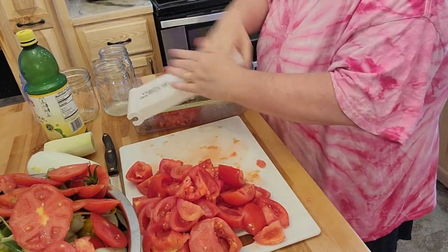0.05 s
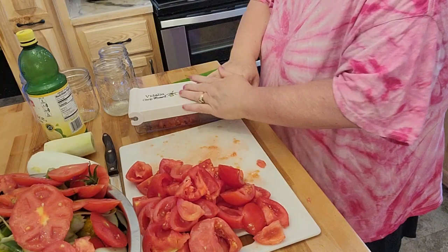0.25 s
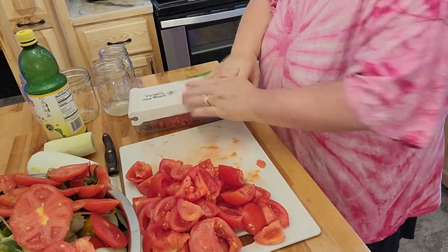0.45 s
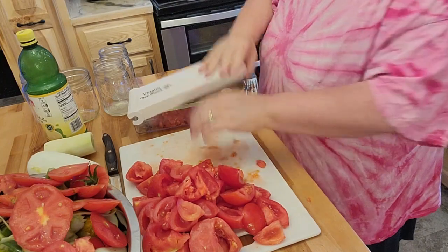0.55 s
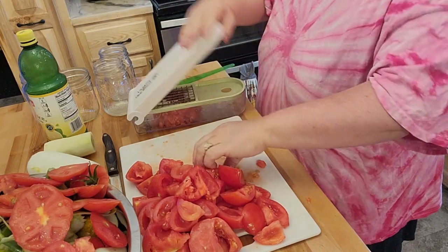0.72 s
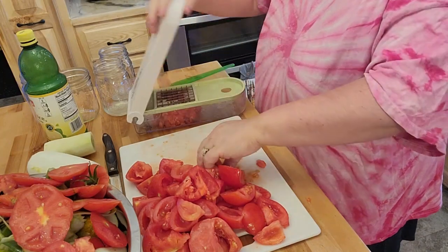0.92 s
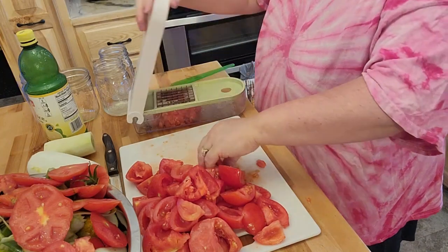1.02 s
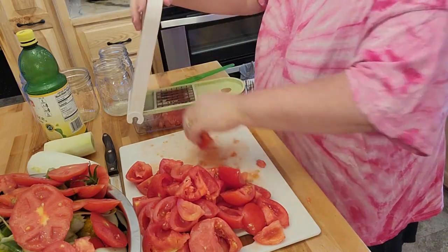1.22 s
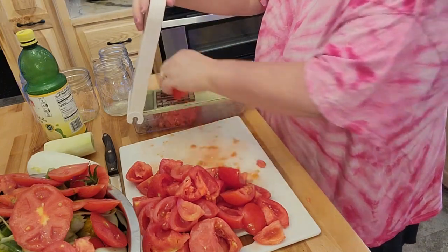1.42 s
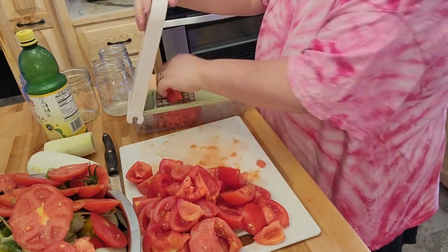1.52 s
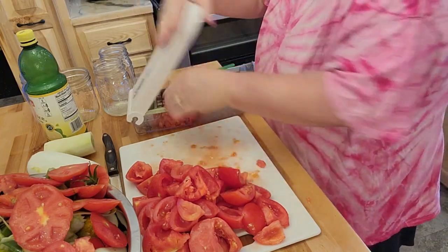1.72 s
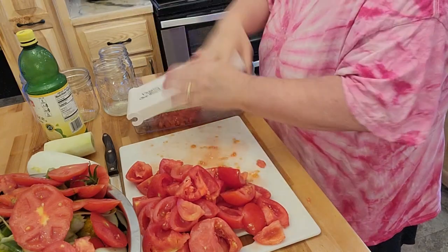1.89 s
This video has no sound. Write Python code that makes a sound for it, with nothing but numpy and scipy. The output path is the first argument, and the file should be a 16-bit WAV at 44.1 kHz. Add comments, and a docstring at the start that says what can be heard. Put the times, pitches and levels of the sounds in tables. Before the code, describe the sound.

A plastic press-down chopper shuts on tomato: a soft knock at 0.14 seconds, a brief wet squash and rising crackle, then a loud, sharp clack at about 0.24 with a low counter boom and short kitchen ring. Faint bumps and rubs follow around 0.4-0.7, then near quiet over low hum, tiny wet ticks near 1.55, a faint tap at 1.7 and a soft lid knock at 1.94.

```python
"""A plastic press-down dicer is pushed shut on tomato pieces on a kitchen counter: damped modes knock as the
lid meets the fruit, a sinking rough sine and coloured noise squash it, grainy noise crackles through the
blade grid, and a cluster of cracks slams lid on box. The counter booms and the kitchen rings briefly as
decaying noise. Soft knocks, rubs, bumps and wet ticks of handling follow over a low hum of noise, then the
lid lands on the next piece."""
import sys
import numpy as np
from scipy import signal
from scipy.fft import rfft, irfft
from scipy.io import wavfile

SR = 44100
rng = np.random.default_rng(int(sys.argv[2]) if len(sys.argv) > 2 else 0)


def unload_audio(sound):
    """Save the sound as a 16-bit wav file, at the path given as the first command line argument."""
    columns = np.transpose(np.atleast_2d(sound))
    # keep every value between -1 and 1, then stretch to whole-number steps
    steps = np.round(np.clip(columns, -1, 1) * 32767)
    wavfile.write(sys.argv[1], SR, steps.astype(np.int16))


N = 85995

# modes of the closed box: (frequency [Hz], relative level [dB], t60 [s])
BOX_MODES = [(195, -17, .12), (252, -16, 0.21), (324.5, -11, .1), (442.1, -2, 0.02), (540.4, -6.5, 0.062),
             (680, -12, .04), (784, -10, 0.021), (988, -16, 0.028), (1274, -16.5, .035), (1619, -22.5, .03),
             (1940, -18, 0.02), (3493, -21.5, .02)]
BOX_LOW_HZ = 170


def undb(db):
    """Decibels to gain."""
    return 10 ** (np.asarray(db) / 20)


def clock():
    """Time of each sample [s]."""
    return np.arange(N) / SR


def freqs():
    """Frequency of each spectral bin [Hz]."""
    return np.arange(N // 2 + 1) * SR / N


def on_log_axis(hz, table, column=1):
    """Interpolate a table column over log frequency."""
    table = np.array(table)
    return np.interp(np.log(hz + 1e-9), np.log(table[:, 0]), table[:, column])


def colour(x, table):
    """Shape a spectrum by (frequency [Hz], relative level [dB]) points, to unit RMS."""
    gain = undb(on_log_axis(freqs(), table))
    shaped = irfft(rfft(x) * gain, N)
    return shaped / shaped.std()


def pair_noise(wide_hz):
    """Noise at two microphones: alike in the bass, unrelated above wide_hz."""
    mid, side = rfft(rng.standard_normal((2, N)))
    apart = np.clip(freqs() / wide_hz, .15, 1)
    sign = np.array([[1], [-1]])
    return irfft((mid + sign * apart * side) / np.hypot(1, apart), N)


def grains(wide_hz):
    """Dense tiny clicks: noise with an exponentially spread level at each sample."""
    spread_db, max_db = 3, 12
    noise = pair_noise(wide_hz)
    boost_db = np.minimum(spread_db * rng.exponential(size=N), max_db)
    return noise * undb(boost_db)


def later(x, s):
    """Start a sound at time s."""
    k = int(np.clip(s * SR, 0, N - 1))
    silence = np.zeros(x.shape[:-1] + (k,))
    return np.concatenate([silence, x[..., :N - k]], axis=-1)


def ring(modes):
    """Damped modes after one blow."""
    out = np.zeros(N)
    for hz, db, t60_s in modes:
        t = np.arange(min(int(2 * t60_s * SR) + 2, N)) / SR
        decay = np.exp(-np.log(1000) * t / t60_s)
        out[:len(t)] += undb(db) * decay * np.sin(2 * np.pi * hz * t)
    return out


def soften(x, hz):
    """A soft contact takes away the treble."""
    sos = signal.butter(2, min(hz, SR / 3), fs=SR, output="sos")
    return signal.sosfilt(sos, x + 1e-18)


def thin(x, hz, order=2):
    """A small part radiates little below its lower edge."""
    sos = signal.butter(order, hz, "highpass", fs=SR, output="sos")
    return signal.sosfilt(sos, x + 1e-18)


def ports(x):
    """A sound reaches the left microphone slightly later."""
    lag_s = .00006  # rounds down to 2 samples
    return np.array([later(x, lag_s), x])


def slam():
    """The lid hits the box in a quick cluster of cracks that ring the plastic."""
    # blows of the lid as it shuts: (time [s], body gain [dB], crack gain [dB])
    blows = [(0.2085, -32.5, -33), (0.2327, -26, -19), (0.2398, -21, -17.5), (0.2428, -4.5, -9),
             (0.2447, -10.5, -11.5), (0.2473, -15.5, -21), (0.251, -15.5, -20), (0.2643, -24.5, -24)]
    # colour of a plastic crack: (frequency [Hz], relative level [dB])
    crack_colour = [(200, -11), (900, 0), (2100, 6), (2900, -1), (3600, 1.5), (4400, -4.5), (5500, 3),
                    (6600, -3.5), (7500, -2), (9500, -11.5), (15500, -17.5)]
    crack_decay_s, rattle_db, rattle_decay_s = 0.0015, -23.5, .012
    t, box = clock(), ring(BOX_MODES)
    fade = np.exp(-t / crack_decay_s) + undb(rattle_db) * np.exp(-t / rattle_decay_s)
    body = sum(undb(body_db) * later(box, s) for s, body_db, _ in blows)
    power = sum((undb(crack_db) * later(fade, s)) ** 2 for s, _, crack_db in blows)
    cracks = np.sqrt(power) * colour(grains(2500), crack_colour)
    return thin(ports(body) + cracks, BOX_LOW_HZ)


def squash():
    """Fruit gives way: an uneven hollow note sinks as the gap closes, with a juicy rustle."""
    # squashed fruit: (time [s], hollow resonance [Hz], level [dB])
    squash_path = [(0.141, 460, -41.5), (0.159, 393.6, -35), (0.179, 350, -34.5), (0.205, 320, -39.5),
                   (0.228, 310, -40), (0.236, 300, -16), (0.244, 290, -22), (0.256, 280, -41)]
    wobble_depth, rough_depth = .16, 0.65  # RMS, as fractions of pitch and amplitude
    juice_db, juice_hz, low_hz = -14.5, 1300, 235
    t = clock()
    s, hz, db = np.array(squash_path).T
    slow_colour = [(60, 7), (200, -6.5), (700, -42.5)]
    flutter, wobble = (colour(noise, slow_colour) for noise in rng.standard_normal((2, N)))
    juice_colour = [(250, -15), (600, 2), (900, -8), (juice_hz, 0), (2500, -14), (9000, -30)]
    juice = colour(rng.standard_normal(N), juice_colour)
    pitch_hz = np.interp(t, s, hz) * (1 + wobble_depth * wobble)
    note = np.sin(2 * np.pi * np.cumsum(pitch_hz) / SR) * (1 + rough_depth * flutter)
    pressure = undb(np.interp(t, s, db)) * (t > s[0]) * (t < s[-1])
    return ports(thin((note + undb(juice_db) * juice) * pressure, low_hz, order=4))


def cutting():
    """Skin tears on the blade grid: a faint steady crackle plus one that swells until the lid lands."""
    start_s, end_s, release_s = .16, .233, 0.0031
    steady_db, swell_db, rise_db_per_s = -57, -28, 1048
    skin_colour = [(100, -23), (400, -7.5), (1400, 8), (3000, -4), (6500, -7.5), (10000, -21), (15500, -27.5)]
    t = clock()
    swell = undb(swell_db + rise_db_per_s * np.minimum(t - end_s, 0))
    gate = (t > start_s) * np.exp(-np.maximum(t - end_s, 0) / release_s)
    return colour(grains(2500), skin_colour) * (swell + undb(steady_db)) * gate


def knocks():
    """The open lid meets fruit and fingers: its modes ring, band-limited for each contact."""
    # soft knocks of lid and hands: (time [s], gain [dB], lower edge [Hz], upper edge [Hz])
    knock_table = [(0.012, -46, 440, 685), (0.129, -33, 410, 696), (0.1398, -18.5, 376, 1484),
                   (0.148, -32.5, 378, 895.3), (0.425, -33.5, 454, 920), (0.680, -46.5, 430.8, 890),
                   (1.586, -45, 334.3, 605), (1.710, -39, 1020, 1430), (1.898, -34, 676, 1336),
                   (1.935, -35.5, 560, 1310), (1.9445, -19.5, 416, 1060)]
    # modes of the open lid: (frequency [Hz], relative level [dB], t60 [s])
    lid_modes = [(473, -5, 0.015), (566, -3.5, 0.034), (685, -6, 0.034), (1237.5, -11, .04),
                 (1430, -15, .025), (1720, -16, 0.0099), (2332, -18.5, 0.023), (3800, -10, .01)]
    lid, out = ring(lid_modes), 0
    for s, db, low_hz, high_hz in knock_table:
        knock = thin(soften(lid, high_hz), low_hz, order=4)
        out = out + undb(db) * later(knock, s)
    return ports(out)


def rubs():
    """Hands slide on the plastic in short grainy swells."""
    # rubs on the lid: (centre time [s], width between 1/e points [s], level [dB])
    rub_table = [(0.081, 0.069, -54.5), (0.568, 0.047, -57), (1.902, 0.12, -61.5)]
    # colour of a rub: (frequency [Hz], relative level [dB])
    rub_colour = [(250, -20), (470, 2), (680, 0), (900, -13), (1280, -5), (1600, -14), (4000, -25.5),
                  (8000, -35), (15000, -45)]
    t = clock()
    swells = sum(undb(db) * np.exp(-(2 * (t - s) / width_s) ** 2) for s, width_s, db in rub_table)
    return colour(grains(1300), rub_colour) * swells


def bumps():
    """Soft pressure stirs mainly the lowest modes of the box."""
    # dull bumps as the hand lifts and the fruit settles: (time [s], peak level [dB])
    bump_table = [(0.463, -44.5), (0.511, -49.5)]
    contact_hz = 380
    dull = soften(soften(ring(BOX_MODES), contact_hz), contact_hz)
    box = thin(dull, BOX_LOW_HZ, order=4)
    box = box / np.abs(box).max()
    return ports(sum(undb(db) * later(box, s) for s, db in bump_table))


def ticks():
    """Wet fingers and fruit unstick: short decaying noise."""
    # small wet ticks: (time [s], level [dB])
    tick_table = [(0.576, -64.5), (1.544, -54), (1.563, -63)]
    # colour of a tick: (frequency [Hz], relative level [dB])
    tick_colour = [(500, -19), (2600, -3), (3500, 7), (4500, -2), (5500, 9.5), (6500, -1), (7600, 0.5),
                   (9300, -2), (10500, -21), (15500, -21)]
    decay_s = 0.0035
    fade = np.exp(-clock() / decay_s)
    return sum(later(undb(db) * fade * colour(pair_noise(3000), tick_colour), s) for s, db in tick_table)


def counter():
    """The weight of the push sets the counter top booming: one damped mode that swells in."""
    start_s, rise_s = .241, .022
    mode = (75.5, -14.5, .2)  # (frequency [Hz], level before the swell [dB], t60 [s])
    swell = 1 - np.exp(-clock() / rise_s)
    return ports(later(swell * ring([mode]), start_s))


def convolve(x, response):
    """Pass a sound through a response."""
    return signal.fftconvolve(np.atleast_2d(x), np.atleast_2d(response), axes=-1)[:, :N]


def kitchen(x):
    """Early reflections from counter and cupboards, then a noise tail with its own decay in each band."""
    # reverberation: (frequency [Hz], band level [dB], t60 [s])
    room_bands = [(60, -15, 0.1), (149.85, -12, .3), (300, -12, .42), (601.7, -7, 0.38), (1190, -4, 0.47),
                  (2500, -4.5, .42), (4900, -6.5, 0.49), (9000, -11.5, .34), (15020, -5.5, .3)]
    build_s, early_db, early_decay_s, wide_hz = .008, -3, .012, 1200
    t, noise, tail = clock(), rfft(pair_noise(wide_hz)), 0
    centres = np.geomspace(60, 15000, 9)
    for hz, pick in zip(centres, np.eye(len(centres))):
        weight = np.interp(np.log(freqs() + 1), np.log(centres), pick)
        band = irfft(noise * weight, N)
        t60_s = on_log_axis(hz, room_bands, column=2)
        fade = np.exp(-np.log(1000) * t / t60_s) * (1 - np.exp(-t / build_s))
        tail = tail + band * fade / np.linalg.norm(fade) * undb(on_log_axis(hz, room_bands))
    near = np.exp(-t / early_decay_s) * (t > .002)
    early = undb(early_db) * pair_noise(wide_hz) * near / np.linalg.norm(near)
    return convolve(x, tail + early)


def room_hum():
    """A steady low hum: noise weighted to the bass."""
    # colour of the hum: (frequency [Hz], relative spectral density [dB])
    hum_colour = [(25, -16.5), (45, -6.5), (72, 6.5), (95, -4), (120, -0.5), (170, -7.5), (400, -10),
                  (1000, -16.5), (3300, -20.5), (6000, -30.5), (8400, -31.5), (9200, -41), (15500, -40.5)]
    level_db = -62.5
    return undb(level_db) * colour(pair_noise(700), hum_colour)


def scene():
    """The dicer in the kitchen, a little to the right, over the boom of the counter and the hum."""
    right_db = 0.25  # right over left
    dicer = knocks() + rubs() + squash() + cutting() + slam() + bumps() + ticks()
    hum = room_hum()
    balance = undb(np.array([[-right_db], [right_db]]) / 2)
    return (dicer + kitchen(dicer) + counter()) * balance + hum


def record(dry):
    """The recorder rounds the highest peaks and cuts the top."""
    ceiling, top_hz = .85, 15650
    rounded = dry / (1 + (dry / ceiling) ** 4) ** (1 / 4)
    sos = signal.ellip(10, .2, 80, top_hz, fs=SR, output="sos")
    return signal.sosfilt(sos, rounded)


dry = scene()
out = record(dry)
unload_audio(out)
```